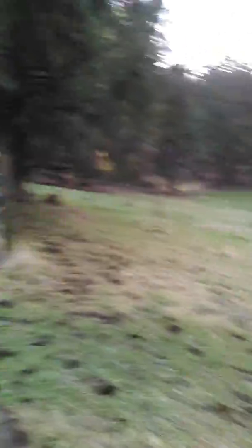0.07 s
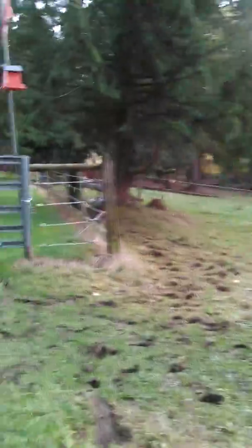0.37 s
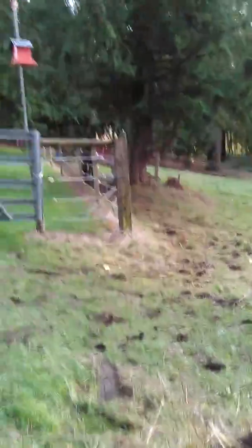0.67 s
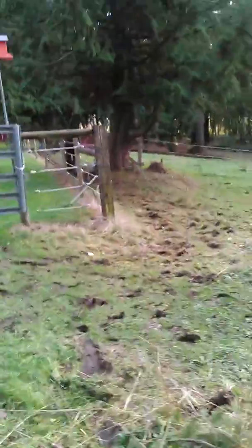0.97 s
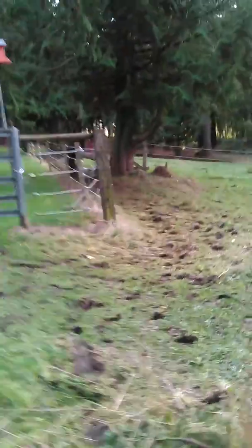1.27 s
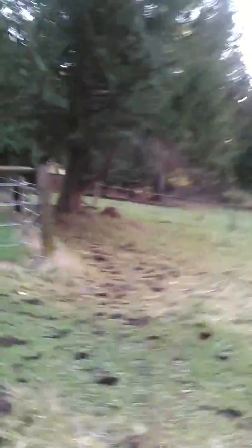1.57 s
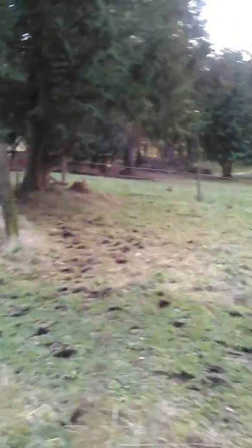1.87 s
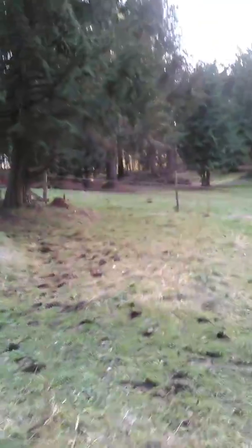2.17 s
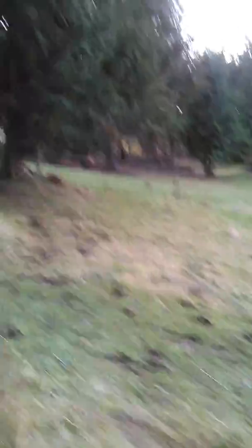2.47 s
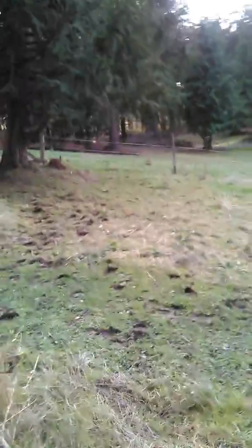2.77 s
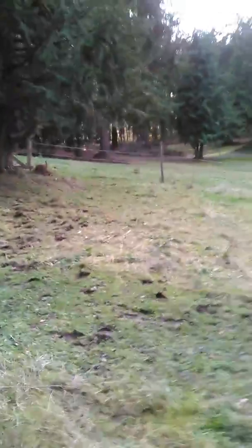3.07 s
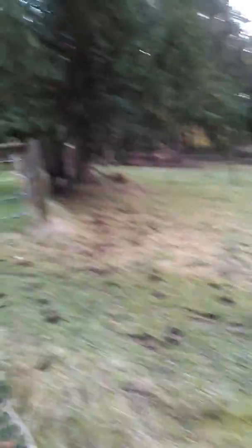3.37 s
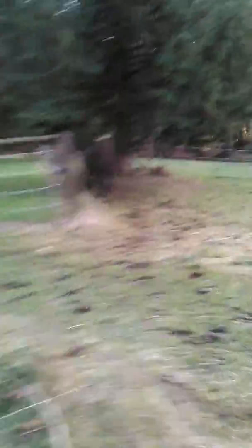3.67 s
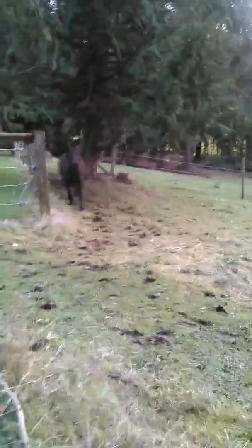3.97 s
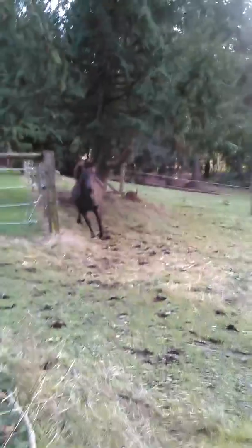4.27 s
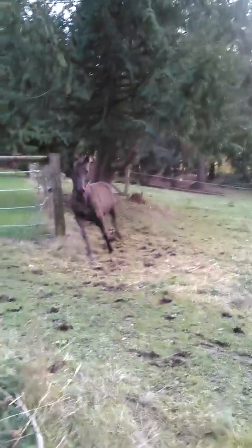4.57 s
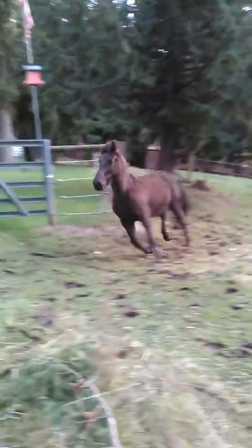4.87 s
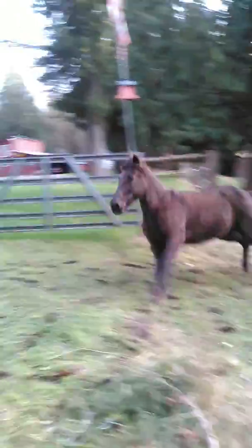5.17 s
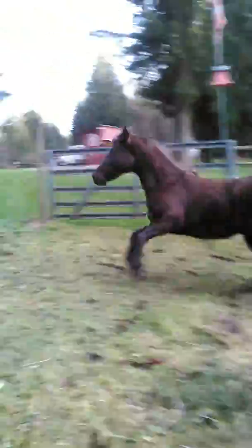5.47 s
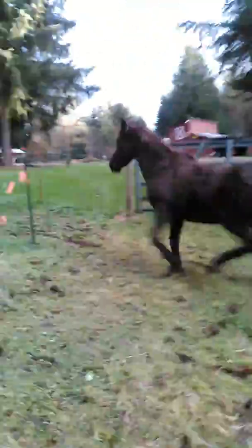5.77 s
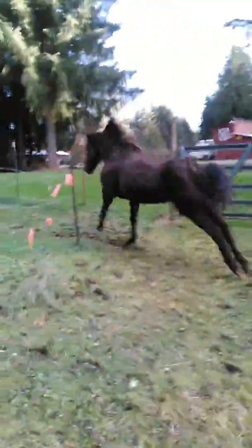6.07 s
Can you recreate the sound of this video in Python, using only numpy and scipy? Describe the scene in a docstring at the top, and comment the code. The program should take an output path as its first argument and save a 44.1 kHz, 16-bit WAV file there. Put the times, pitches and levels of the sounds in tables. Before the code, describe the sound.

Wind rumbles on the microphone and dry stalks snap as a horse's hoofbeats approach and pound the turf close by.

```python
"""A grass paddock edged by trees: a horse gallops across, pulls up close by and leaps away, bucking.
Her hooves knock on the turf by impact, set the soil into damped oscillation and tear the grass.
Near the microphone, stalks rustle by friction and snap by brittle fracture.
Turbulent wind buffets the microphone and drives one low resonance, over the soft rush of the trees."""
import sys
import numpy as np
from scipy import signal
from scipy.fft import rfft, irfft
from scipy.io import wavfile

SR = 44100
rng = np.random.default_rng(int(sys.argv[2]) if len(sys.argv) > 2 else 0)


def wav_out(sig):
    """Save sig, one row per channel (or a flat mono array), as 16-bit PCM at SR to the path in sys.argv[1]."""
    wavfile.write(sys.argv[1], SR, np.round(np.clip(np.atleast_2d(sig).T, -1, 1) * 32767).astype(np.int16))


N = 269892
T = np.arange(N) / SR
BRIEF = T[:SR // 4]  # time axis of one short event

# spectrum of dry grass, rustling or splintering: f/Hz, level/dB
GRASS_SPECTRUM = [(450, -23), (850, -7), (1300, -24), (2200, -13.5), (3300, -28.5), (4500, -14), (5250, -6),
                  (6200, -18), (7200, -28), (8000, -39.5), (9100, -37), (12000, -62.5)]


def gain_of(db):
    """Amplitude ratio of a level in decibels."""
    return 10 ** (np.asarray(db) / 20)


def unit_rms(x):
    """Normalisation to unit mean power."""
    return x / np.sqrt(np.mean(x ** 2) + 1e-20)


def follow(rows):
    """Linear interpolation of (time, value) rows at every sample."""
    return np.interp(T, *np.transpose(rows))


def add(mix, onset, sound):
    """Superposition of a sound on the mix, from its onset in seconds."""
    part = mix[round(onset * SR):][:len(sound)]
    part += sound[:len(part)]


def coloured(x, spectrum, bump_hz=1000, lift_db=0, octaves=0.83):
    """Spectral shaping by (f/Hz, level/dB) rows and an optional Gaussian bump; rms 1."""
    octave = np.log2(np.fft.rfftfreq(len(x), 1 / SR) + 1)
    hz, db = np.transpose(spectrum)
    curve_db = np.interp(octave, np.log2(hz), db, right=-120)
    bump_db = lift_db * np.exp(-((octave - np.log2(bump_hz)) / octaves) ** 2)
    return unit_rms(irfft(rfft(x) * gain_of(curve_db + bump_db), len(x)))


def wander(cutoff_hz):
    """Slow random modulation: low-passed noise of rms 1."""
    hz = np.fft.rfftfreq(N, 1 / SR)
    return unit_rms(irfft(rfft(rng.standard_normal(N)) / (1 + (hz / cutoff_hz) ** 4), N))


def grains(samples, per_s, spread_db, hiss):
    """Shot noise: random impulses of uneven size over a white hiss."""
    size = gain_of(spread_db * np.minimum(rng.exponential(1, samples), 4))
    clicks = size * rng.choice([-1, 1], samples) * (rng.random(samples) < per_s / SR)
    return unit_rms(clicks) + hiss * rng.standard_normal(samples)


def swell(peak_s, steep):
    """Gamma envelope: a power-law rise to 1 at peak_s, then an exponential tail."""
    u = BRIEF / peak_s
    return (u * np.exp(1 - u)) ** steep


def gust_levels():
    """Incoherent addition: gusts and calm air sum in power, giving drone and buffeting levels in dB."""
    # gusts at the microphone: t/s, duration/s, drone level/dB, buffeting level/dB
    gusts = [(0, 0.015, -16.5, -30.5), (0.189, 0.11, -26, -37), (0.346, 0.068, -21.5, -37.5),
             (0.57, 0.06, -29, -34), (0.8, 0.11, -36.5, -44), (0.961, 0.58, -33, -42),
             (1.808, 0.37, -35.5, -38), (2.315, 0.61, -43.5, -37.5), (2.814, 0.34, -31.5, -35),
             (3.456, 0.14, -29, -28.5), (3.613, 0.14, -22.5, -32.5), (3.85, 0.14, -28, -36.5),
             (4.037, 0.078, -32, -38.5), (4.173, 0.41, -27, -34), (4.569, 0.69, -17, -26.5),
             (5.357, 0.45, -37.5, -34.5), (5.875, 0.15, -27.5, -33)]
    rise_s, fall_s, sag_db_per_s = 0.041, 0.16, 5.5
    calm_drone_db, calm_buffet_db = -50, -46
    power = gain_of([[calm_drone_db], [calm_buffet_db]]) ** 2 * np.ones(N)
    for onset, duration, drone_db, buffet_db in gusts:
        age = np.maximum(T - onset, 0)
        rise = np.minimum(age / rise_s, 1) if onset > 0.01 else 1  # the first is already blowing
        fall = np.exp(-np.maximum(age - duration, 0) / fall_s)
        envelope = rise * gain_of(-sag_db_per_s * age) * fall
        power += (gain_of([[drone_db], [buffet_db]]) * envelope) ** 2
    return 10 * np.log10(power)


def wind():
    """Forced resonance: gusts sustain one low drone amid lumpy turbulence, with brief lulls."""
    # the resonance, drifting down: t/s, f/Hz
    drone_pitch = [(0, 67.94), (3.6, 63.7), (6.12, 61.82)]
    # spectrum of the turbulent pressure: f/Hz, level/dB
    buffet_spectrum = [(12, -46), (28, -14), (47, -0.5), (64, -4), (92, 0.5), (135, -6.5), (170, -13),
                       (260, -18.5), (420, -41), (900, -54.5)]
    # moments when the wind drops: t/s, half-width/s
    lulls = [(2.785, 0.018), (3.228, 0.019), (3.361, 0.024), (3.586, 0.009), (3.84, 0.01), (4.005, 0.018)]
    gust_db, buffet_db = gust_levels()
    pitch = follow(drone_pitch) * (1 + 0.011 * wander(18))
    waver_db = 0.95 * np.clip(gust_db / -17, 1, 2.2) ** 2  # a weaker drone wavers more
    drone_db = gust_db + waver_db * np.minimum(wander(21), 1.5)
    drone = np.sqrt(2) * np.sin(2 * np.pi * np.cumsum(pitch) / SR) * gain_of(drone_db)
    lumps_db = 3 * wander(19)
    buffeting = coloured(rng.standard_normal(N), buffet_spectrum) * gain_of(buffet_db + lumps_db)
    lull_db = -11 * sum(np.exp(-((T - centre) / half_s) ** 2) for centre, half_s in lulls)
    return gain_of(lull_db) * (drone + buffeting)


def trees():
    """Amplitude-modulated noise: a dull distant rush with fluttering bands, and two faint tones."""
    # overall envelope of the rush: t/s, level/dB
    levels = [(0, -39.5), (1.65, -43), (2.95, -38.5), (3.35, -40), (4.3, -40), (6.12, -36.5)]
    # spectrum of wind in the trees: f/Hz, level/dB
    rush_spectrum = [(120, -24.5), (200, 2.5), (267, -6.5), (399, -0.5), (469, -8), (618, -5), (867, -2),
                     (1290, -13.5), (1840, -20), (2100, -18), (2650, -14), (3110, -18), (4000, -19),
                     (5200, -29.5), (8800, -120)]
    # brief tones from far off: t/s, level/dB, f/Hz, rise time/s
    far_tones = [(1.065, -41.5, 884, 0.027), (1.34, -36.5, 562, 0.014)]
    # spectrum beneath each fluttering band: f/Hz, level/dB
    flutter_spectrum = [(150, -36.5), (300, 4.5), (900, -7), (1800, -10), (4000, -58.5)]
    rush = coloured(rng.standard_normal(N), rush_spectrum) * gain_of(2.5 * wander(8.4))
    flutter = np.zeros(N)
    for hz in (319.4, 559, 835, 2290):
        band = coloured(rng.standard_normal(N), flutter_spectrum, hz, lift_db=19.5, octaves=0.21)
        flutter += band * gain_of(5.5 * wander(21.8))
    out = gain_of(follow(levels)) * (gain_of(-9) * rush + gain_of(-21) * flutter)
    for onset, db, hz, peak_s in far_tones:
        add(out, onset, gain_of(db) * np.sin(2 * np.pi * hz * BRIEF) * swell(peak_s, steep=9.6))
    return out


def rustle():
    """Friction noise: nearby grass blades rub and tick together, and single tufts brush past."""
    # envelope of the rustle: t/s, level/dB
    levels = [(0, -57.5), (0.12, -54.5), (0.28, -77), (0.44, -60), (0.56, -63), (1.85, -67.5),
              (2.24, -62.5), (2.33, -54), (2.55, -51.5), (3.0, -46), (3.55, -54.5), (4.5, -61)]
    # single tufts: peak t/s, level/dB, half-width/s, bump f/Hz, bump height/dB
    brushes = [(0.187, -60, 0.28, 2610, 24), (0.465, -49, 0.012, 5100, 5), (1.04, -54.5, 0.078, 3350, 22.5),
               (1.409, -55, 0.095, 4760, 1.5), (2.052, -52.5, 0.066, 5450, 5),
               (3.006, -41, 0.011, 4170, 14), (3.022, -32.5, 0.011, 5000, 20), (3.682, -43, 0.033, 5570, 7),
               (4.092, -49.5, 0.039, 6200, 10), (4.282, -43.5, 0.0093, 5740, 11)]
    clicks = grains(N, per_s=110, spread_db=3.5, hiss=0)
    ticks = coloured(clicks, GRASS_SPECTRUM, 5900, lift_db=14, octaves=0.3)
    rubbing = coloured(rng.standard_normal(N), GRASS_SPECTRUM)
    out = gain_of(follow(levels) + 1.3 * wander(15)) * (rubbing + gain_of(-4) * ticks)
    for centre, db, half_s, hz, lift_db in brushes:
        onset = max(centre - len(BRIEF) / SR, 0)
        t = onset + T[:2 * len(BRIEF)]
        contacts = grains(len(t), per_s=640, spread_db=0, hiss=1)
        tuft = coloured(contacts, GRASS_SPECTRUM, hz, lift_db, octaves=0.15)
        add(out, onset, gain_of(db) * tuft * np.exp(-((t - centre) / half_s) ** 2 / 2))
    return out


def scuffs():
    """Sliding friction: short grainy rubs, each gathered around its own frequency."""
    # scuffs and dull bumps close by: t/s, level/dB, rise time/s, bump f/Hz
    rubs = [(0, -36.5, 0.022, 342), (0.61, -45, 0.08, 287), (0.99, -43.5, 0.032, 374),
            (3.095, -30.5, 0.023, 210), (3.099, -42, 0.03, 760), (3.61, -37.5, 0.038, 246),
            (4.705, -38.5, 0.018, 1280), (5.354, -32.5, 0.019, 1300), (5.395, -33, 0.03, 440),
            (5.905, -30, 0.02, 213), (5.96, -36.5, 0.05, 540)]
    # spectrum of a rub: f/Hz, level/dB
    rub_spectrum = [(100, 0.5), (300, 10.5), (1800, -8.5), (5300, -10), (7300, -31.5), (10000, -41)]
    out = np.zeros(N)
    for onset, db, peak_s, hz in rubs:
        contacts = grains(len(BRIEF), per_s=1800, spread_db=1, hiss=0.66)
        rub = coloured(contacts, rub_spectrum, hz, lift_db=15, octaves=0.3)
        add(out, onset, gain_of(db) * rub * swell(peak_s, steep=1.8))
    return out


def snaps():
    """Brittle fracture: a thin dry stalk rings for a few cycles and splinters, with no low end."""
    # stalks breaking: t/s, level/dB, f/Hz
    fractures = [(1.572, -36, 4920), (2.864, -28.5, 5700), (3.18, -22.5, 5400), (3.7547, -12.5, 5230),
                 (3.7542, -20, 2950), (3.756, -16, 3940), (4.085, -25, 5860)]
    out = np.zeros(N)
    for onset, db, hz in fractures:
        crack = np.sin(2 * np.pi * hz * BRIEF) * swell(2.2 / hz, steep=1.7)
        splinters = coloured(rng.standard_normal(len(BRIEF)), GRASS_SPECTRUM) * swell(0.001, steep=0.08)
        add(out, onset, gain_of(db) * (crack + gain_of(-23) * splinters))
    return signal.sosfilt(signal.butter(8, 2550, "high", fs=SR, output="sos"), out)


def thuds():
    """Damped oscillation: a heavy landing punches the sod, then the soil heaves for a few cycles."""
    # soil yielding under the horse's weight: t/s, level/dB, f/Hz
    landings = [(2.846, -22, 50.4), (3.089, -18, 69), (3.283, -29.5, 78), (3.52, -15.5, 85.6),
                (3.629, -19, 90), (4.031, -16, 83), (4.874, -13.5, 132), (5.154, -11.5, 115),
                (5.2567, -4, 110), (5.389, -22.5, 122), (5.499, -22, 77.5), (5.676, -23, 136),
                (5.8754, -3.5, 117), (5.915, -14, 140), (5.929, -16.5, 119)]
    punch_db, punch_hz, lead_s = -15.5, 229, 0.005
    punch = gain_of(punch_db) * np.sin(2 * np.pi * punch_hz * BRIEF) * swell(0.0024, steep=1.2)
    out = np.zeros(N)
    for onset, db, hz in landings:
        heave = -np.cos(2 * np.pi * hz * BRIEF) * swell(0.014, steep=2.9)
        add(out, onset - lead_s, gain_of(db) * punch)
        add(out, onset, gain_of(db) * heave)
    return out


def bending_stalks():
    """Independent sources: each size of stalk ticks at its own moments, in its own band."""
    # band centres of thick to thin stalks: f/Hz
    stalk_bands = [750, 1300, 2350, 3150, 4000, 5100, 6500]
    octave = np.log2(np.fft.rfftfreq(N, 1 / SR) + 1)
    spectrum = 0
    for band in np.eye(len(stalk_bands)):
        power_share = np.interp(octave, np.log2(stalk_bands), band)
        spectrum += np.sqrt(power_share) * rfft(grains(N, per_s=200, spread_db=2.6, hiss=0.7))
    return irfft(spectrum, N)


def turf():
    """Friction and rupture: legs swish through grass; in torn tufts roots pop and blades crackle."""
    # envelope of the swish: t/s, level/dB
    swish_levels = [(3.9, -63), (4.57, -52.5), (4.63, -46), (4.76, -42), (4.85, -48), (5.12, -45.5),
                    (5.24, -37), (5.35, -43), (5.405, -35.5), (5.455, -39.5), (5.495, -34), (5.64, -44),
                    (5.84, -51.5), (5.93, -36), (6.0, -50), (6.12, -39)]
    # spectrum of grass underfoot: f/Hz, level/dB
    turf_spectrum = [(700, 2.5), (1400, -3.5), (1900, -19.5), (2250, -0.5), (2850, -5.5), (3100, -0.5),
                     (3450, -4.5), (4400, -15), (4850, 0), (5200, 1.5), (5900, -15.5), (7200, -32.5),
                     (8000, -41.5), (13000, -57)]
    # tufts torn by a hoof: t/s, level/dB, pop and bump f/Hz
    tears = [(4.599, -30.5, 5330), (4.804, -28, 2760), (4.8734, -31, 2516), (4.991, -24.5, 5610),
             (5.048, -26.5, 3440), (5.0718, -24.5, 5750), (5.151, -20, 5230), (5.1701, -17, 4710),
             (5.2543, -13.5, 2560), (5.372, -29, 3200), (5.391, -18.5, 3850), (5.4167, -21.5, 2790),
             (5.477, -23.5, 5060), (5.494, -24, 4850), (5.555, -15.5, 2555), (5.658, -28, 2600),
             (5.8705, -21, 5780), (5.912, -19, 2900), (6.0419, -16, 3120)]
    rise_s, decay_s = 0.0037, 0.0057
    tear_envelope = (1 - np.exp(-BRIEF / rise_s)) * np.exp(-BRIEF / decay_s)
    swish_db = follow(swish_levels) + 1.5 * wander(35)
    out = gain_of(swish_db) * coloured(bending_stalks(), turf_spectrum)
    for onset, db, hz in tears:
        ruptures = grains(len(BRIEF), per_s=3000, spread_db=5, hiss=0.7)
        crackle = coloured(ruptures, turf_spectrum, hz, lift_db=8, octaves=0.36)
        pop = np.sin(2 * np.pi * hz * BRIEF) * swell(0.003, steep=12)
        add(out, onset, gain_of(db) * crackle * tear_envelope)
        add(out, onset + 0.00091, gain_of(db - 8) * pop)
    return out


def loose_earth():
    """Granular collisions: crumbs of soil patter, at a slightly different pitch on each patch."""
    # spectrum of crumbling soil: f/Hz, level/dB
    earth_spectrum = [(90, -11), (260, -18.5), (460, 3.5), (800, -2.5), (1400, -4.5), (1900, -27.5),
                      (3500, -27.5)]
    middle_hz, spread_octaves = 577, 1.2
    hz = middle_hz * 2 ** (spread_octaves * (rng.random() - 0.5))
    crumbs = grains(len(BRIEF), per_s=1300, spread_db=3.5, hiss=0.18)
    return coloured(crumbs, earth_spectrum, hz, lift_db=3)


def knock(hz, earth_db):
    """Heavily damped impact: a short tone pulse from the turf with a patter of loose earth."""
    pulse = -np.sin(2 * np.pi * hz * BRIEF) * swell(0.0024, steep=2.9)
    return pulse + gain_of(earth_db) * loose_earth() * swell(0.0022, steep=0.6)


def hooves():
    """Impact excitation of modes: each blow knocks, the hardest ring, and thrown soil lands after."""
    # hooves striking the turf: t/s, knock level/dB, knock f/Hz, thrown soil level/dB
    blows = [(4.004, -31, 627, -59), (4.042, -29, 790, -50), (4.41, -27, 479, -42),
             (4.698, -25.5, 590, -37), (4.719, -28, 513, -43), (4.804, -25.5, 810, -45),
             (4.873, -27.5, 680, -41), (5.094, -25, 500, -44), (5.148, -28, 590, -47),
             (5.251, -13.5, 516, -60), (5.337, -25.5, 545, -36), (5.367, -20, 650, -41),
             (5.387, -10, 560, -31.5), (5.392, -19.5, 583, -37.5), (5.413, -14.5, 466, -40.5),
             (5.433, -18, 485, -53), (5.446, -20, 583, -45), (5.467, -15, 530, -36),
             (5.474, -15.5, 538, -41), (5.584, -18, 570, -37), (5.603, -20, 553, -49),
             (5.701, -17.5, 566, -36), (5.7497, -21, 513, -39), (5.87, -18.5, 354, -36),
             (5.912, -15, 440, -30), (5.943, -28, 386, -48), (5.952, -18.5, 566, -44),
             (6.04, -22.5, 563, -48), (6.114, -20.5, 490, -48)]
    # modes excited by every blow: f/Hz, level/dB, T60/s
    modes = [(443, -7, .09), (530, -6, .05), (760, -6, .015), (947, -4, .03), (1122, 0, .04),
             (1300, -9, .025), (1485, -3, .035), (3085, -11, .035)]
    cushion_s, flight_s = 0.00085, 0.021
    ring = sum(gain_of(db - 60 * BRIEF / t60) * np.sin(2 * np.pi * hz * BRIEF) for hz, db, t60 in modes)
    ring *= 1 - np.exp(-(BRIEF / cushion_s) ** 2)  # grass cushions the first contact
    ring /= abs(ring).max()
    out = np.zeros(N)
    for onset, db, hz, soil_db in blows:
        earth_db = -7.5 + 0.23 * db  # faint blows are duller
        ring_db = 13.5 + 2.65 * db  # the ring grows faster than the knock
        add(out, onset + 0.001365, gain_of(db) * knock(hz, earth_db))
        add(out, onset + 0.00221, -gain_of(ring_db) * ring)
        add(out, onset, gain_of(soil_db) * loose_earth() * swell(flight_s, steep=1.7))
    return out


def scene():
    """Linear superposition of all sources at one microphone."""
    return (wind() + trees() + rustle() + scuffs() + snaps() + thuds() + turf() + hooves())[None]


def record(dry):
    """Frequency response of a small microphone: a dip at 7.9 kHz, softer treble above, a band limit."""
    hz = np.fft.rfftfreq(N, 1 / SR)
    response_db = np.interp(hz, [7000, 7900, 8800], [0, -12, -3])
    heard = irfft(rfft(dry) * gain_of(response_db), N)
    low_pass = signal.firwin(255, cutoff=15500, window=("kaiser", 8), fs=SR)
    return signal.oaconvolve(heard, low_pass[None], "same")


dry = scene()
out = record(dry)
wav_out(out)
```